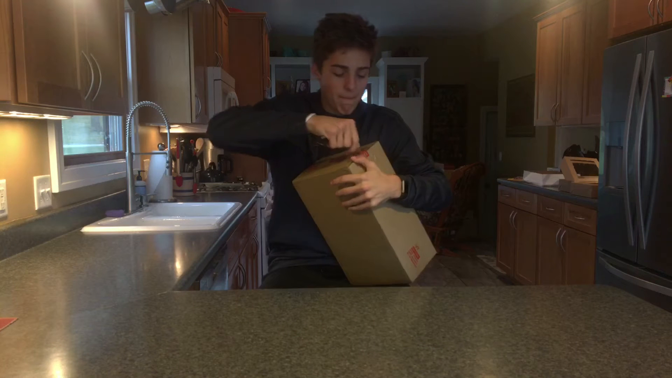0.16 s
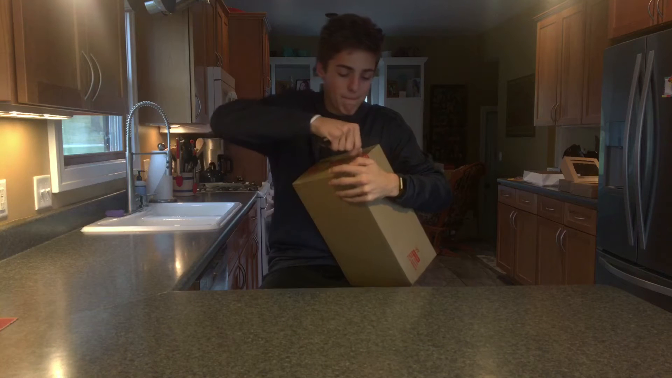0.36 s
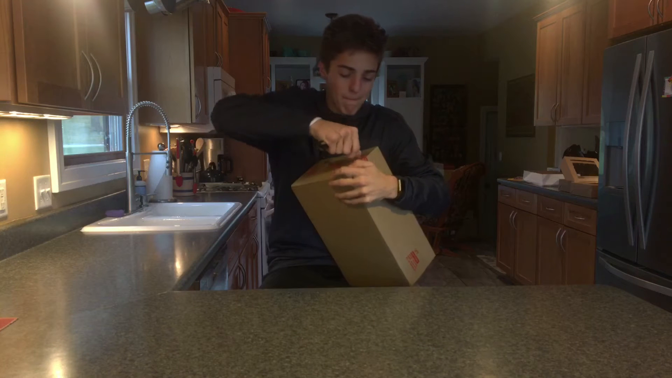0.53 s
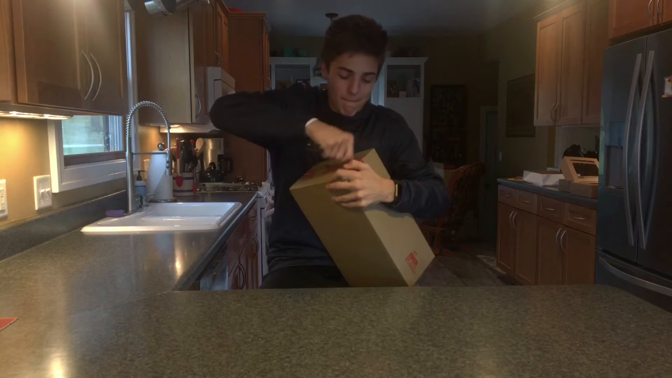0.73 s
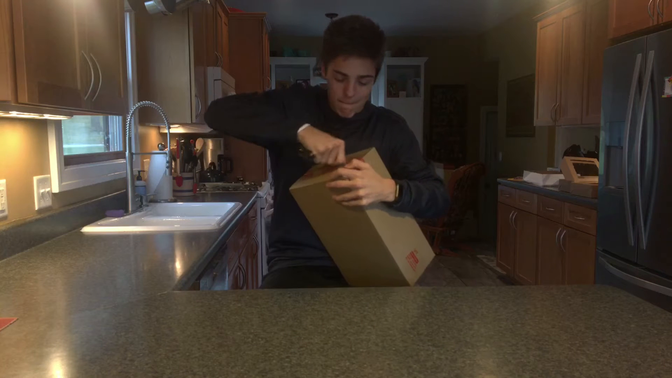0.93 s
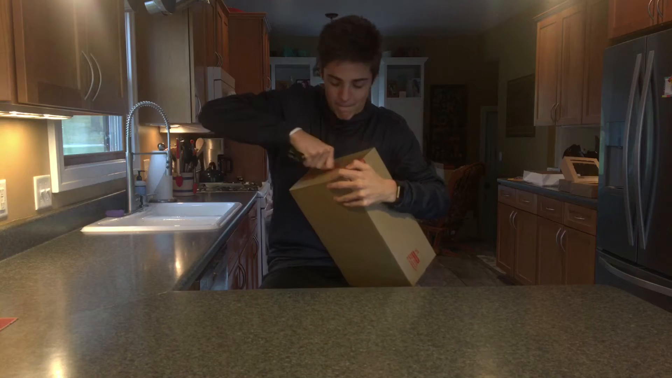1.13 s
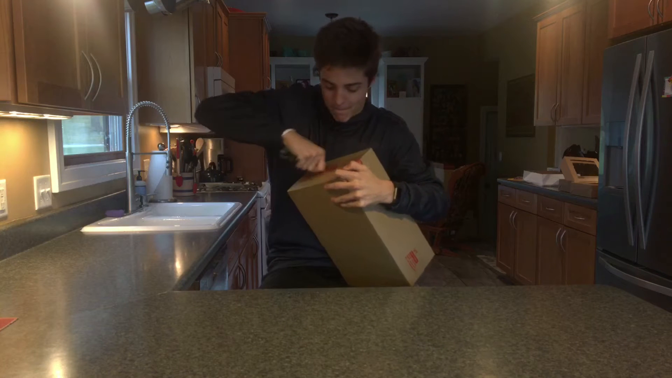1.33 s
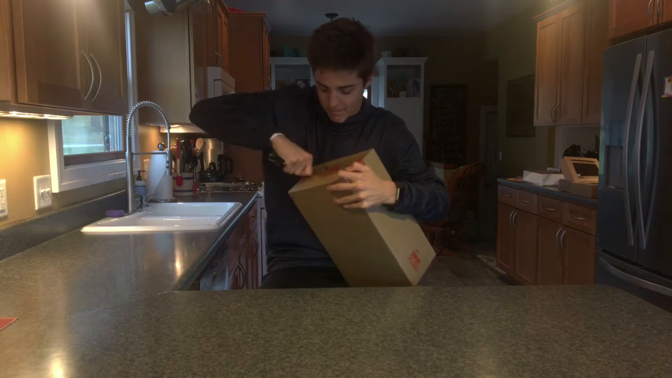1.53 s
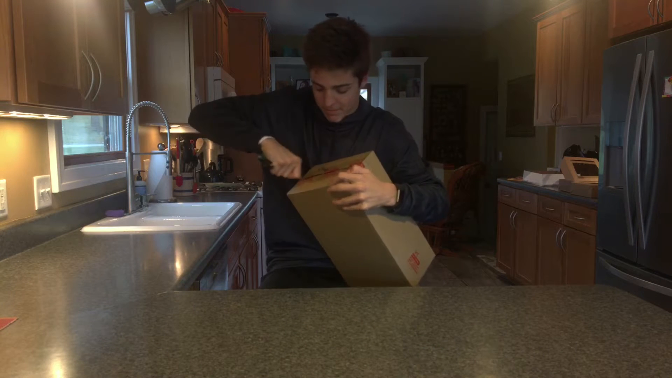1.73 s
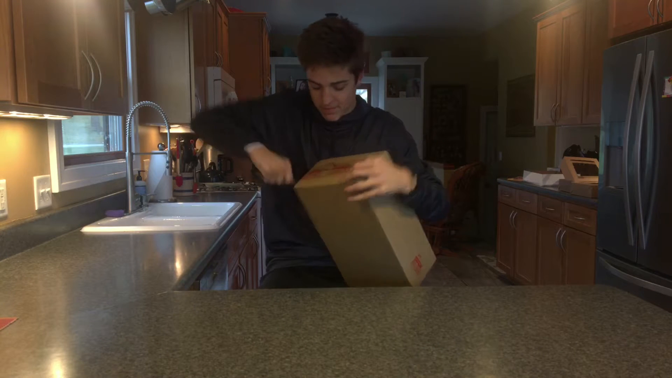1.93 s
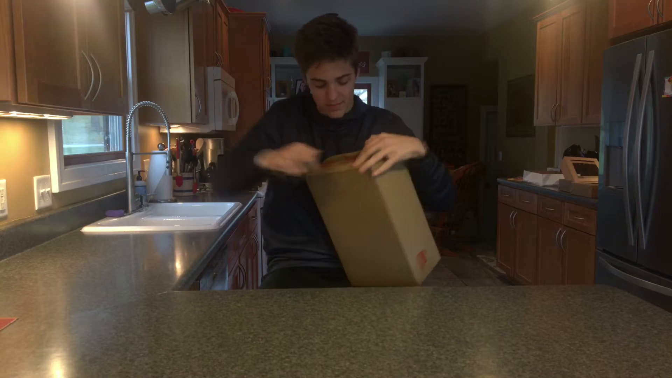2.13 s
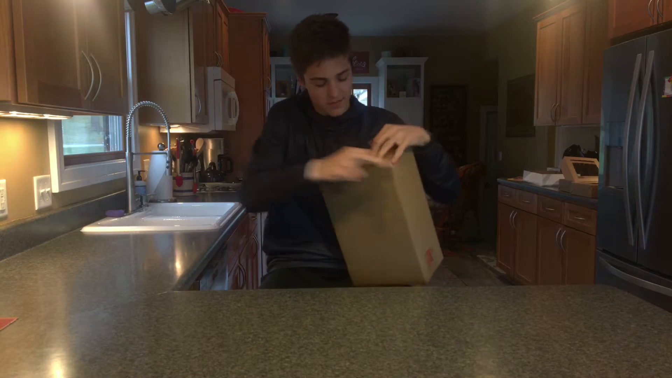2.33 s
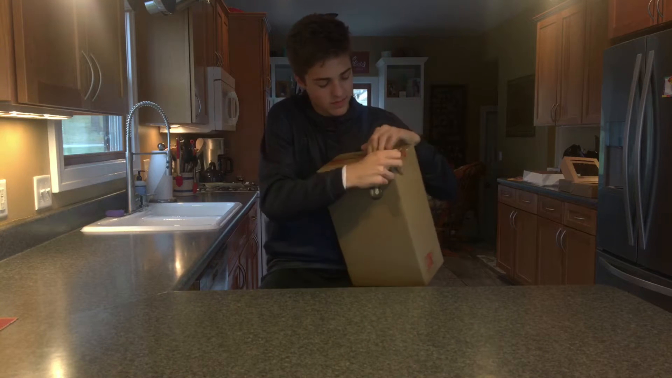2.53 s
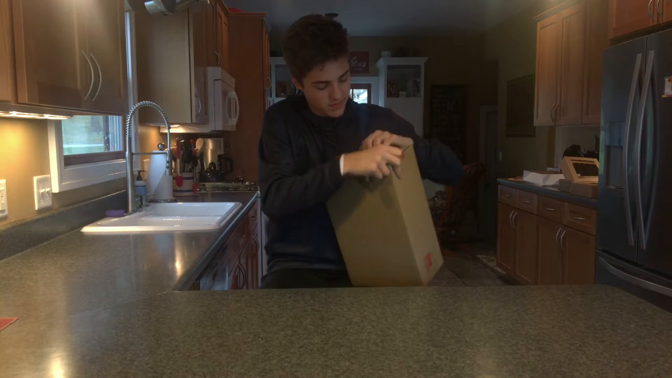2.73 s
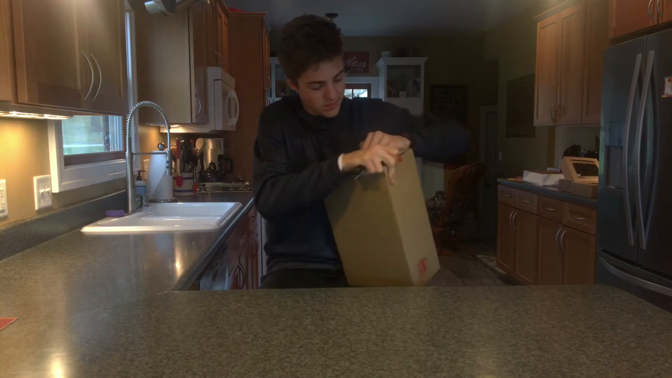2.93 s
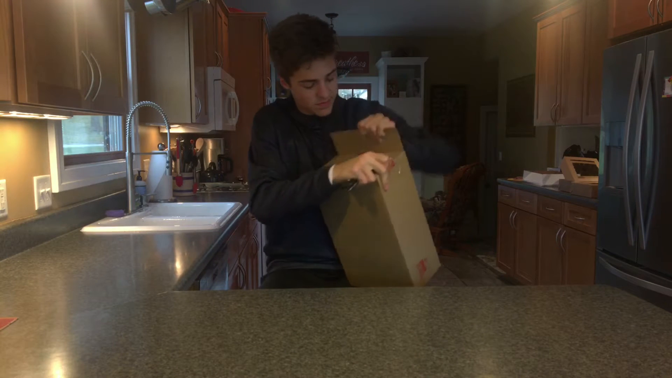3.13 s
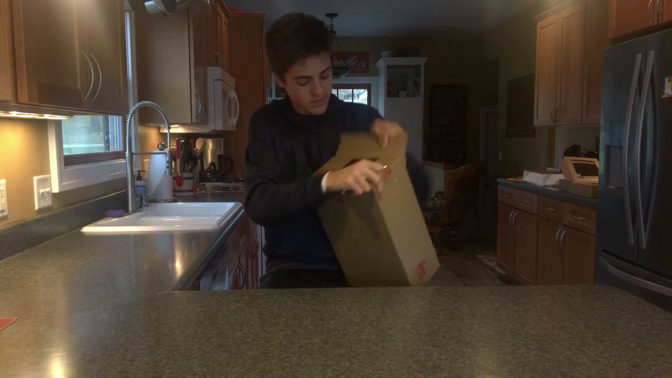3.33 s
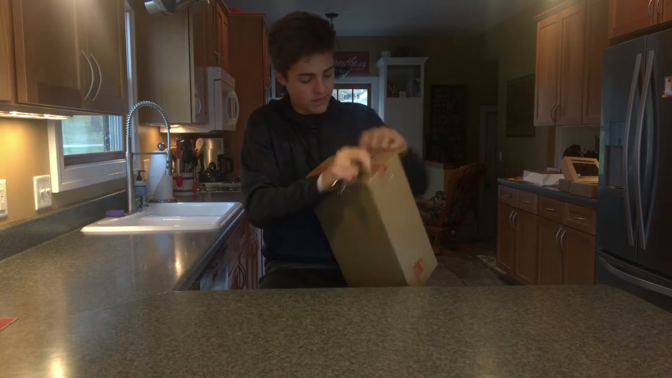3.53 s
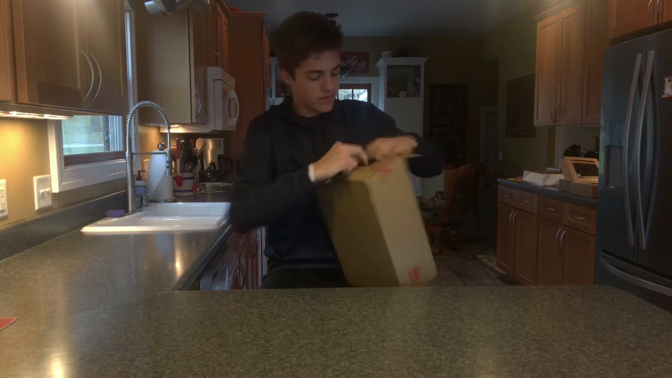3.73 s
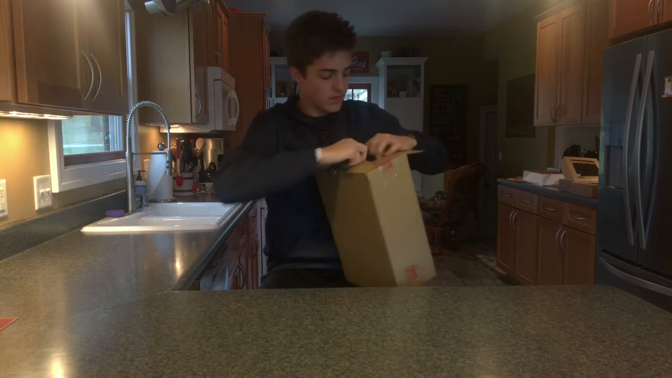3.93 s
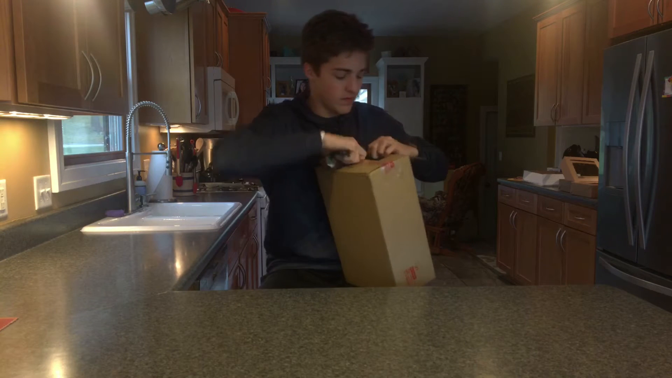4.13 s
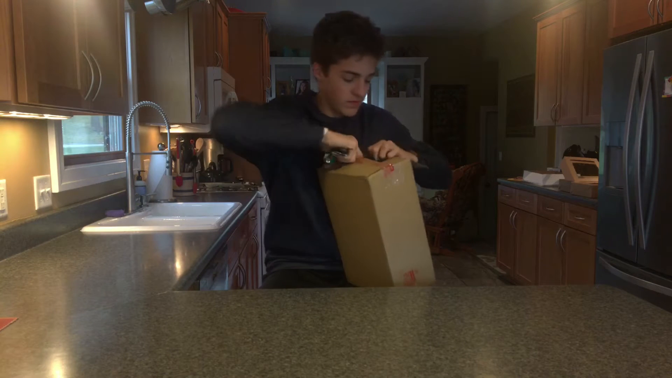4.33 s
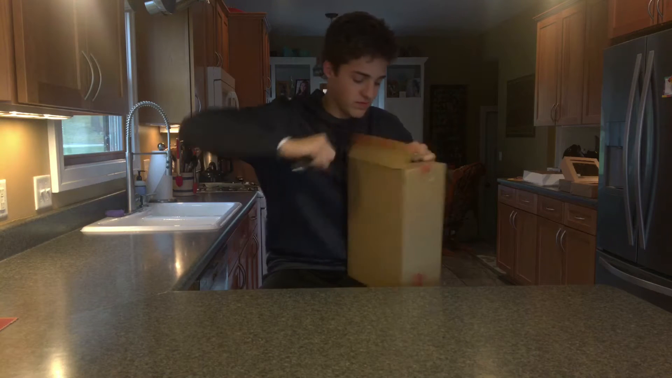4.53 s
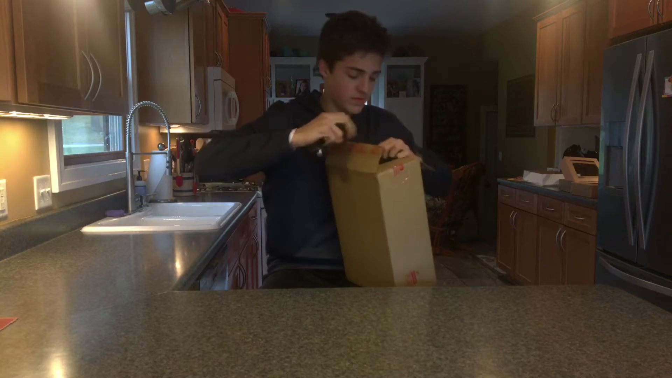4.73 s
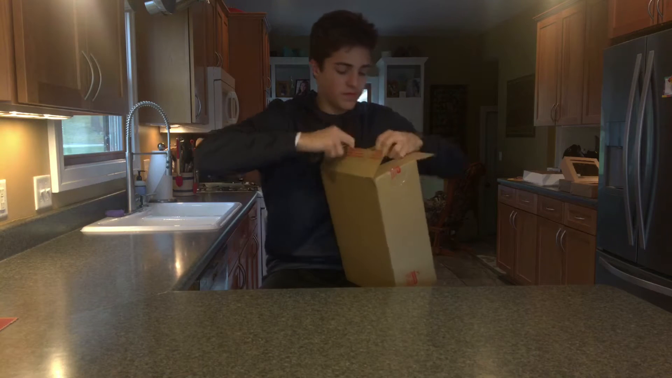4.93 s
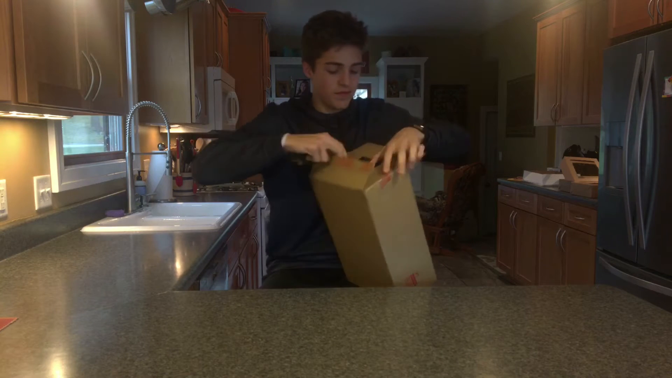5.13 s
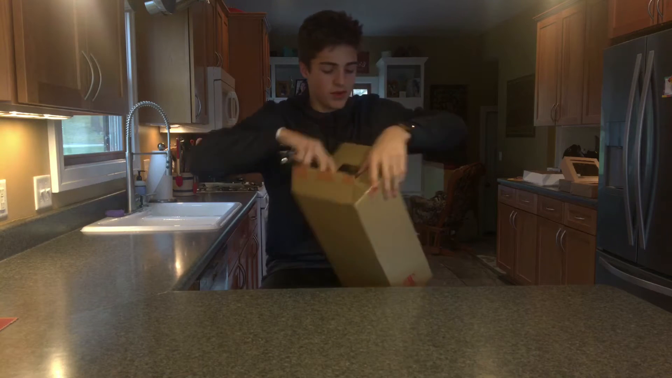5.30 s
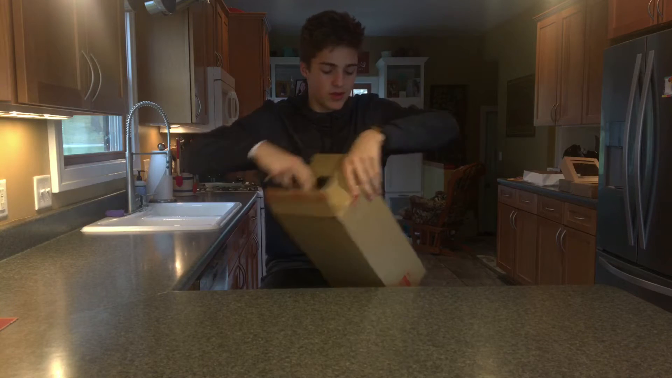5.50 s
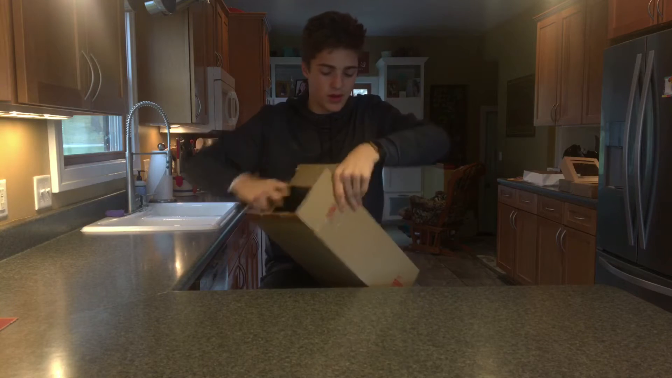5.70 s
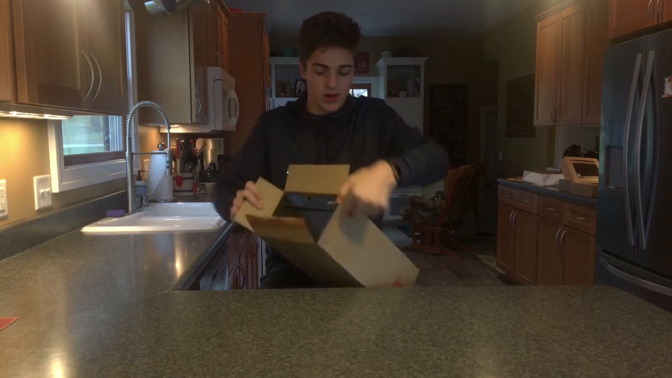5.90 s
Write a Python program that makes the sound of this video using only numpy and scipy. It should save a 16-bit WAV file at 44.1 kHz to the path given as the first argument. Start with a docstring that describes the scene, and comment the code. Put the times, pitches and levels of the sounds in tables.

```python
"""A taped cardboard box is opened by hand in a hard, echoing kitchen, over quiet room tone.
First a blade rasps along the tape; fibres snap, and the hollow box booms as its walls flex.
From 2 s fingers pick at the seam. At 3.1 s the tape bursts with a loud rip and the freed flap rings;
a second rip follows at 4.4 s. Last, the flaps slide apart, knocking and squeaking."""
import sys
import numpy as np
from scipy import signal
from scipy.fft import rfft, irfft, next_fast_len
from scipy.io import wavfile

SR = 44100
rng = np.random.default_rng(int(sys.argv[2]) if len(sys.argv) > 2 else 0)


def inscribe(sig):
    """Save sig as 16-bit PCM at rate SR to the path in sys.argv[1].

    A 1-D sig is mono; a 2-D sig holds one channel per row.
    Samples are clipped to [-1, 1] before scaling.
    """
    pcm = np.round(np.clip(np.atleast_2d(sig).T, -1, 1) * 32767)
    wavfile.write(sys.argv[1], SR, pcm.astype(np.int16))


N = 262736
TIME = np.arange(N) / SR
BURST_TIME = TIME[:SR // 8]


def from_db(db):
    return 10 ** (np.asarray(db) / 20)


def rms_one(x):
    return x / np.sqrt(np.mean(x ** 2) + 1e-20)


def unit_burst(x):
    """Scale to the energy of 10 ms at rms 1."""
    return x * np.sqrt(SR / 100 / (np.sum(x ** 2) + 1e-20))


def add(out, start_s, sound):
    at = max(round(start_s * SR), 0)
    out[at:at + len(sound)] += sound[:max(N - at, 0)]


def band(x, low_hz, high_hz, order=2):
    """Causal band-pass."""
    sos = signal.butter(order, [low_hz, min(high_hz, .45 * SR)], "band", fs=SR, output="sos")
    return signal.sosfilt(sos, x)


def resonate(x, hz, width_hz):
    """Two-pole resonator, peak gain 1."""
    r = np.exp(-np.pi * width_hz / SR)
    feedback = [1, -2 * r * np.cos(2 * np.pi * hz / SR), r * r]
    return signal.lfilter(np.array([1, 0, -1]) * (1 - r * r) / 2, feedback, x + 1e-18)


def colour(x, spectrum):
    """Apply a smooth spectrum; rms 1."""
    hz, db = np.transpose(spectrum)
    size = next_fast_len(N)
    bins_hz = np.maximum(np.fft.rfftfreq(size, 1 / SR), 1)
    gain = from_db(np.interp(np.log(bins_hz), np.log(hz), db))
    return rms_one(irfft(rfft(x, size) * gain, size)[:N])


def drift(rate_hz, size):
    """Interpolated Gaussian noise, knots of spread 1."""
    knots = rng.standard_normal(size // 8)
    return np.interp(np.arange(size) * rate_hz / SR, np.arange(len(knots)), knots)


# background spectrum: f/Hz, level/dB
ROOM_TONE = [(20, -2), (45, -0.5), (62, 2), (90, -16.5), (140, -15.5), (220, -16.5), (320, -20),
             (600, -23.5), (2000, -29), (6000, -31), (16000, -36)]
def room_tone():
    """Steady noise, mostly low rumble."""
    return colour(rng.standard_normal(N), ROOM_TONE)


# blade, hand and flap strokes: t/s, length/s, level/dB, hiss offset/dB, drone offset/dB
STROKES = [ (0, 0.037, -49, -20, -6.5), (0.134, 0.1, -60, 4.5, -8), (0.295, 0.07, -56, 6, -12),
           (0.384, 0.032, -56.5, -6, -4), (0.616, 0.033, -61, 6, -3), (0.687, 0.022, -56.5, 0, -12),
           (0.752, 0.054, -49, -0.5, 0.5), (0.852, 0.025, -39.5, -1, -5.5), (0.903, 0.045, -52, -6, 4),
           (1.028, 0.034, -39.5, -0.5, 3), (1.053, 0.044, -34, -15.5, -1), (1.142, 0.18, -47.5, -4, 0.5),
           (1.314, 0.12, -36.5, -7, 3.5), (1.443, .05, -49.5, -10, 8), (1.497, 0.12, -39.5, -5.5, 2),
           (1.698, 0.069, -45.5, -1.5, -11), (1.778, 0.074, -43, -12, 6), (1.887, 0.15, -61, 8, -17),
           (2.031, 0.055, -64.5, 14, -14), (2.16, .09, -60, -2, -10), (2.264, 0.075, -51, 1.5, -2),
           (2.403, 0.11, -49.5, 0.5, -2), (2.525, 0.076, -59, 4.5, -7), (2.688, 0.12, -64.5, 4, 3),
           (2.768, 0.19, -53.5, -0.5, 1), (2.967, 0.11, -54, -13, 2), (3.338, 0.27, -51.5, -4, -10),
           (3.489, 0.2, -52, 2.5, -0.5), (3.726, 0.098, -43, 1.5, 3), (3.844, 0.11, -49.5, -3.5, -3.5),
           (3.96, 0.25, -53.5, 1, 2), (4.161, 0.082, -42.5, -28, 4), (4.253, 0.13, -52.5, -2, 4.5),
           (4.726, 0.12, -47, -18, -12), (4.861, 0.092, -51, -2, 6), (4.972, 0.19, -53.5, 0.5, -14),
           (5.116, 0.03, -42, 4, -2.5), (5.193, 0.19, -56.5, 4, 4), (5.413, 0.049, -40.5, -7, -5),
           (5.479, .11, -39, 4.5, -8), (5.614, 0.08, -38.5, -5, -5.5), (5.688, 0.17, -37.5, 3, -8)]
def stroke_levels(attack_s=0.014, sag_db_per_s=14, release_s=0.02, linger_db=-20.5, linger_s=0.09):
    """Each stroke grips, eases, lets go and creeps on; gains of rasp, hiss and drone."""
    power, t = np.full((3, N), 1e-12), TIME[:SR]
    attack = np.minimum(t / attack_s, 1)
    for start_s, length_s, db, hiss_db, drone_db in STROKES:
        after_s = np.maximum(t - length_s, 0)
        linger = from_db(linger_db) * np.exp(-after_s / linger_s)
        release = np.maximum(np.exp(-after_s / release_s), linger)
        envelope = attack * release * from_db(db - sag_db_per_s * (t - length_s / 2))
        for layer, layer_db in zip(power, (0, hiss_db, drone_db)):
            add(layer, start_s, (from_db(layer_db) * envelope) ** 2)
    hand_pressure = from_db(2.5 * drift(rate_hz=43, size=N))
    return np.sqrt(power) * hand_pressure


def friction(catches_per_s, catch_db, judder_db):
    """Fibre hiss with lone catches, in stick-slip judder."""
    caught = rng.random(N) < catches_per_s / SR
    sizes = from_db(14.4 * np.minimum(rng.exponential(1, N), 4)) * rng.choice([-1, 1], N)
    grains = rng.standard_normal(N) + from_db(catch_db) * rms_one(caught * sizes)
    return grains * from_db(judder_db * drift(rate_hz=130, size=N))


# hollow box modes: f/Hz, width/Hz, level/dB
BOX_MODES = [(135, 27, -5), (264, 24, -3.5), (296.1, 6.3, 5.5), (339.4, 45, -2.5), (403, 80, -8.5),
             (602.5, 10, -14), (717, 152, -18.5), (1340, 17, -10)]
def box(push):
    """Walls and enclosed air resonate."""
    return sum((-1) ** k * from_db(db) * resonate(push, hz, width_hz)
               for k, (hz, width_hz, db) in enumerate(BOX_MODES))


# board rasp and fibre hiss spectra: f/Hz, level/dB
RASP = [(200, -33), (480, 7.5), (750, 2), (1250, 6), (1900, 6), (3000, 0.5), (4500, -8), (7000, -3.5),
        (16000, -43)]
HISS = [(1500, -23), (3500, -2), (5200, 1.5), (7300, -4), (9000, 2), (10500, -4.5), (12000, 1.5),
        (16000, -5.5)]
def rubbing(levels, rasp_db, hiss_db, drone_db):
    """Sliding contact: the board rasps, its fibres hiss, the box drones."""
    grains = friction(catches_per_s=610, catch_db=-9.5, judder_db=3.5)
    rasp = from_db(rasp_db) * levels[0] * colour(grains, RASP)
    hiss = from_db(hiss_db) * levels[1] * colour(grains, HISS)
    drone = from_db(drone_db) * levels[2] * rms_one(box(grains))
    return rasp + hiss + drone


def thumps(swings, box_db=-18, knock_db=-6):
    """A panel swings for a few cycles and sets the box ringing."""
    out = np.zeros(N)
    boom = unit_burst(box(signal.unit_impulse(len(BURST_TIME))))
    for start_s, db, hz in swings:
        rise_s = 1 / hz
        swell = BURST_TIME / rise_s * np.exp(-BURST_TIME / rise_s)
        swing = unit_burst(swell * np.sin(2 * np.pi * hz * BURST_TIME))
        knock = unit_burst(band(swell * rng.standard_normal(len(BURST_TIME)), .7 * hz, 2 * hz))
        add(out, start_s - rise_s / 2, from_db(db) * (swing + from_db(knock_db) * knock))
        coupling = min(hz / 300, 300 / hz) ** 2   # strongest near the box's pitch
        add(out, start_s, from_db(db + box_db) * coupling * boom)
    return out


# knocks: t/s, level/dB, f/Hz
KNOCKS = [(.005, -42, 142), (4.441, -26.5, 61.6), (4.824, -26.5, 660), (5.402, -27, 750), (5.738, -32, 880),
          (5.94, -35, 1150)]
def knocks():
    """The box or a flap is struck."""
    return thumps(KNOCKS)


def fractures(rows, clump_db, lead_db, low_hz, split_hz, top_hz, ring_q, straggler_db, box_db):
    """A first crack, then a dying avalanche; nearby board and the box ring with it."""
    out = np.zeros(N)
    first_crack = from_db(lead_db) * np.exp(-BURST_TIME / 0.00091)
    for start_s, db, treble_db, decay_s, ring_hz, ring_db in rows:
        clumps = from_db(clump_db * drift(rate_hz=1566, size=len(BURST_TIME)))
        age = BURST_TIME / decay_s
        avalanche = np.exp(-age) + from_db(straggler_db) * np.exp(-age / 4)
        cracks = rng.standard_normal(len(BURST_TIME)) * (first_crack + clumps * avalanche)
        crunch = unit_burst(band(band(cracks, low_hz, split_hz, order=1), 450, 12500))
        treble = from_db(treble_db) * unit_burst(band(cracks, split_hz, top_hz))
        ring = from_db(ring_db) * unit_burst(resonate(cracks, ring_hz, ring_hz / ring_q))
        body = from_db(box_db) * unit_burst(box(cracks))
        add(out, start_s, from_db(db) * (crunch + treble + ring + body))
    return out


def stray_snaps(rub_gain, per_s=24, treble_db=-4, decay_s=0.00066, ring_db=-1.5):
    """Single fibres break at random, as strongly as the board is rubbed; rows for fractures()."""
    times_s = np.cumsum(rng.exponential(1 / per_s, 400))
    rows = []
    for start_s in times_s[times_s < TIME[-1]]:
        db = 20 * np.log10(rub_gain[int(start_s * SR)]) + rng.uniform(-6, -3)
        ring_hz = 2380 * (8100 / 2380) ** rng.random()
        rows.append((start_s, db, treble_db, decay_s, ring_hz, ring_db))
    return rows


# fibre and tape snaps: t/s, level/dB, treble/dB re level, ring f/Hz, ring/dB re level
SNAPS = [ (.024, -50, 4, 3960, -3), (0.0857, -54, 8, 3750, 3), (0.14, -42, -16, 8540, -14),
         (0.1518, -57, 9, 8200, 11.5), (.3288, -44, -3, 9600, -12), (0.3512, -49, 3, 2700, -2),
         (0.588, -53, 5, 5000, -3), (0.6471, -48.5, 7.5, 8940, -17), (.7405, -37, -18, 2600, -2),
         (0.7443, -27, 3, 2550, -14.5), (0.8753, -35, -14, 2430, -3.5), (0.9524, -39, -5, 6330, -2.5),
         (1.074, -37, 4, 2280, -15), (1.24, -37, -4, 8850, -3), (1.275, -30, -6, 3000, -18),
         (1.3045, -31.5, -8, 5200, -2), (1.3285, -29, -3, 4000, -5.5), (1.3528, -28.5, -14, 5630, -6.5),
         (1.37, -33.5, -1, 2990, -13), (1.637, -30, -0.5, 3120, -11), (1.786, -27.5, -9, 7900, -1.5),
         (1.813, -32.5, -7, 2740, -20), (1.921, -43, 0, 2600, -2), (2.1393, -42.5, -24, 4200, -17),
         (2.1536, -37, -3, 3420, -11), (2.749, -47, -1, 4080, 6.5), (2.8474, -45.5, -5, 6100, 3),
         (3.5047, -41, 3.5, 4600, 5.5), (3.5859, -36, -5, 9840, -5), (3.6256, -35, -2, 6000, -7),
         (3.6973, -40, 16.5, 9000, 7), (3.711, -27.5, -24, 8900, -6), (3.766, -37, 3, 9700, -12),
         (3.9518, -38, 0, 2530, -11.5), (4.0742, -40.5, -5, 3140, -4), (4.0991, -52.5, 6, 2500, 12),
         (4.3448, -42, -3, 9500, -7), (4.363, -34.5, 3, 5100, 4), (4.3681, -34, 2, 6400, -6),
         (4.7531, -40.5, -11, 4750, -4), (4.8236, -51.5, 9.5, 1980, 17), (5.16, -49, 21, 3480, -15),
         (5.1638, -36.5, -23, 3500, 9), (5.255, -32.5, -9, 1280, 1.5), (5.2905, -31, -2.5, 4380, -21),
         (5.4008, -30, -10, 945, -9), (5.565, -40, 12.5, 4470, 1), (5.7384, -27.5, -4, 1300, -5.5),
         (5.9399, -30, -1.5, 5360, 4)]
def snaps(rub_gain, ref_decay_s=0.0042, ref_db=-41, doubling_db=29):
    """Fibres and tape break; stronger snaps crackle longer."""
    rows = [(start_s, db, treble_db, ref_decay_s * 2 ** ((db - ref_db) / doubling_db), ring_hz, ring_db)
            for start_s, db, treble_db, ring_hz, ring_db in SNAPS]
    return fractures(rows + stray_snaps(rub_gain), clump_db=1, lead_db=-6.5, low_hz=1110,
                     split_hz=6270, top_hz=15900, ring_q=6.6, straggler_db=-16, box_db=-10.5)


# wall flexes: t/s, level/dB
FLEXES = [(0.878, -20.5), (1.076, -34.5), (1.278, -29.5), (1.331, -35), (1.79, -30), (2.454, -35),
          (3.589, -32), (3.629, -31), (3.708, -23), (3.804, -28), (3.969, -32), (4.223, -34),
          (4.399, -10.5), (4.828, -24.5), (5.263, -30.5), (5.656, -32.5), (5.746, -27.5)]
def flexes(wall_hz=331, spread=0.025):
    """A wall bends under the hand and springs back; pitch varies with the grip."""
    return thumps([(start_s, db, wall_hz * np.exp(spread * rng.standard_normal()))
                   for start_s, db in FLEXES])


# box heaves: t/s, level/dB, air boom/dB re level
HEAVES = [(1.354, -26, -11), (1.817, -27, -12), (3.092, -7.5, -11.5), (4.437, -10.5, -4.5)]
def heaves(wall_hz=304, air_hz=143.5, air_lag_s=0.00452):
    """The tape gives, the whole box heaves, the air inside follows."""
    walls = [(start_s, db, wall_hz) for start_s, db, _ in HEAVES]
    air = [(start_s + air_lag_s, db + boom_db, air_hz) for start_s, db, boom_db in HEAVES]
    return thumps(walls + air)


# stages of both rips: t/s, level/dB, treble/dB re level, decay/s, ring f/Hz, ring/dB re level
RIPS = [(3.0617, -12.5, -8, 0.0045, 1440, -8.5), (3.0661, -15, -25, 0.0062, 1280, -21),
        (3.0841, -18, -3, 0.0081, 3180, -4), (3.089, -19, -22, 0.01, 1300, -1),
        (4.397, -14, -9.5, 0.0063, 1330, -14.5), (4.4078, -24.5, 8, 0.0088, 4270, -4),
        (4.418, -18.5, -6, 0.0013, 4300, -5.5), (4.435, -16, -1.5, 0.0012, 2900, -29),
        (4.437, -12.5, -11, 0.009, 1890, -18)]
def rips():
    """The taped flap bursts open in quick fractures; one signal per stage."""
    return [fractures([stage], clump_db=2.5, lead_db=3.5, low_hz=700, split_hz=4600,
                      top_hz=15100, ring_q=11.4, straggler_db=-12, box_db=-11) for stage in RIPS]


# flap modes: f/Hz, level/dB, T60/s
FLAP_MODES = [(1050, -6, 0.29), (1270, -9, 0.24), (1340, 7, 0.25), (1230, -1, .5), (1685, -1, 0.32),
              (1440, -18, .45), (1770, -10, 0.34)]
def flap_ring(start_s):
    """Sudden release plucks every mode of the flap."""
    out, t = np.zeros(N), TIME[:SR]
    for hz, db, t60_s in FLAP_MODES:
        add(out, start_s, from_db(db - 60 * t / t60_s) * np.sin(2 * np.pi * (hz * t + rng.random())))
    return out


# flap edge squeaks: t/s, length/s, level/dB, start f/Hz
SQUEAKS = [(5.482, 0.033, -40, 3300), (5.558, 0.013, -33, 4600), (5.704, 0.027, -31.5, 4920),
           (5.76, 0.071, -54, 4350)]
def squeaks(roughness_hz=600, rise_hz_per_s=9000):
    """Stick-slip at a rough pitch that rises as the free part of the flap shortens."""
    out, t = np.zeros(N), BURST_TIME
    for start_s, length_s, db, hz in SQUEAKS:
        swell = np.sqrt(np.maximum(np.sin(np.pi * np.minimum(t / length_s, 1)), 0))
        phase = 2 * np.pi * np.cumsum(hz + rise_hz_per_s * t) / SR
        rough = drift(roughness_hz, len(t)) * np.sin(phase) + drift(roughness_hz, len(t)) * np.cos(phase)
        add(out, start_s, from_db(db) * swell * rms_one(rough))
    return out


# kitchen reverberation: f/Hz, T60/s, level/dB re direct
KITCHEN = [(139, 0.45, -4), (195, 0.31, 0.5), (303, 0.49, -6), (710, 0.63, -2.5), (1380, 0.59, -2),
           (2740, 0.7, -5.5), (6000, 0.53, -5.5), (10100, 0.39, -8), (16000, 0.32, -11.5)]
def kitchen(x, first_echo_s=0.00091, build_s=0.0037):
    """Dense echoes off counters and cupboards build fast and decay band by band."""
    t = TIME[:SR]
    hz, t60_s, db = np.transpose(KITCHEN)
    edges_hz = np.geomspace(70, 18000, num=13)
    white, response = rng.standard_normal((2, SR)), 0
    onset = np.clip((t - first_echo_s) / build_s, 0, 1)
    for k, (low_hz, high_hz) in enumerate(zip(edges_hz, edges_hz[1:])):
        log_hz = np.log(low_hz * high_hz) / 2
        decay = from_db(-60 * t / np.interp(log_hz, np.log(hz), t60_s))
        tail = band(white[k % 2], low_hz, high_hz) * onset * decay
        to_direct_level = np.sqrt(2 * (high_hz - low_hz) / SR / np.sum(tail ** 2))
        response = response + tail * to_direct_level * from_db(np.interp(log_hz, np.log(hz), db))
    return signal.fftconvolve(x, response)[:N]


def scene():
    """Mono mix of box, echoes and room tone; gains here add to the table levels."""
    levels = stroke_levels()
    rubs = rubbing(levels, rasp_db=-3.5, hiss_db=1.5, drone_db=1) + squeaks()
    walls = from_db(-2.5) * (knocks() + flexes() + heaves())
    crackle = from_db(-1.5) * snaps(rub_gain=levels[0])
    rip_stages = [from_db(1) * stage for stage in rips()]
    flap = from_db(-26) * flap_ring(start_s=RIPS[0][0])
    # each part leaves from another side of the box and meets its own echoes
    heard = sum(x + kitchen(x) for x in [rubs, walls, crackle + flap, *rip_stages])
    return (heard + from_db(-51.5) * room_tone())[None]


def record(dry, cutoff_hz=16000):
    """Soft clip, then steep low-pass."""
    rounded = 1.124 * np.tanh(dry / 1.125)
    return signal.sosfilt(signal.ellip(10, .1, 80, cutoff_hz, fs=SR, output="sos"), rounded)


dry = scene()
out = record(dry)
inscribe(out)
```